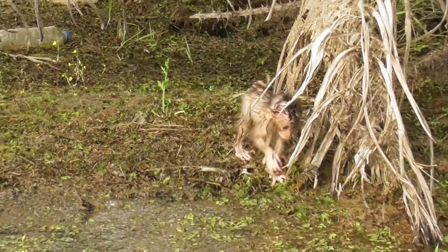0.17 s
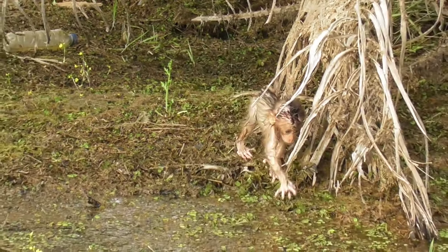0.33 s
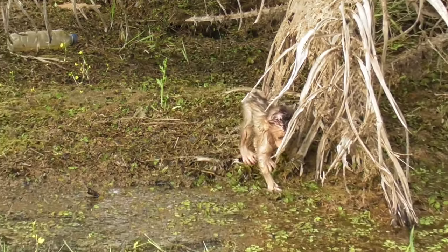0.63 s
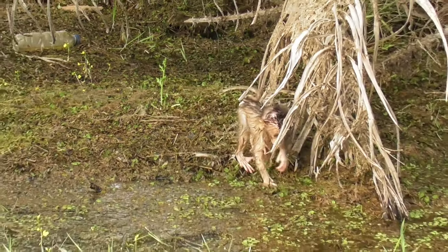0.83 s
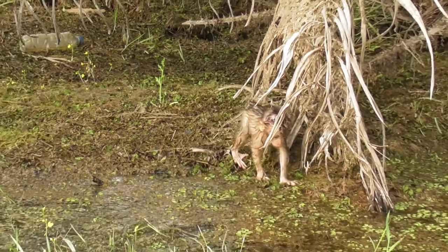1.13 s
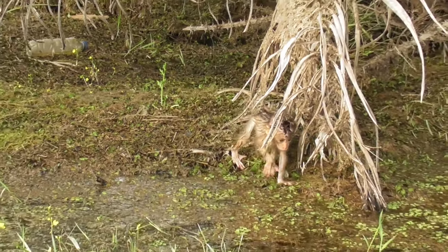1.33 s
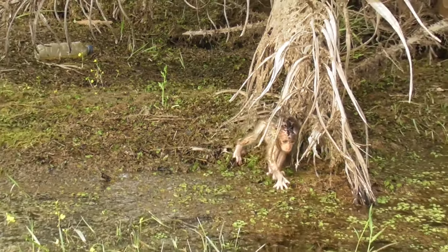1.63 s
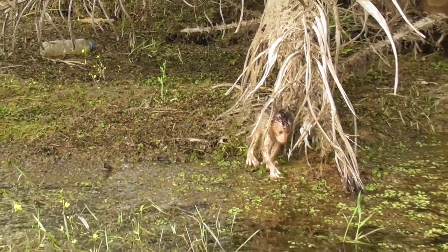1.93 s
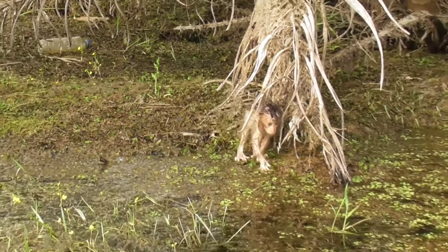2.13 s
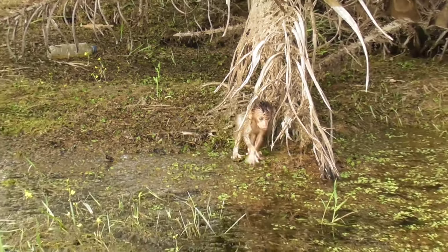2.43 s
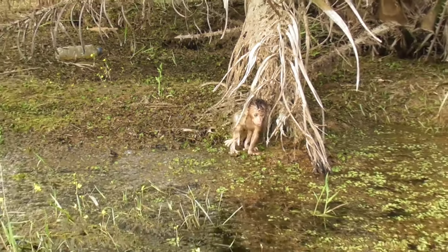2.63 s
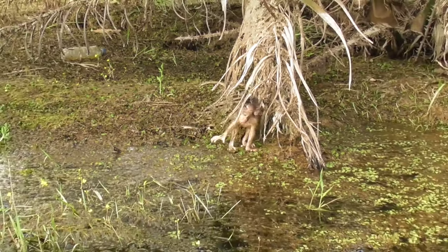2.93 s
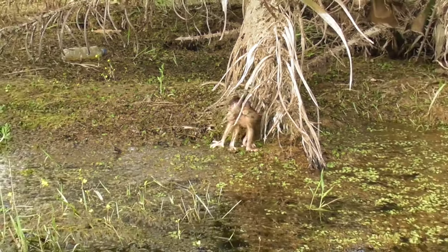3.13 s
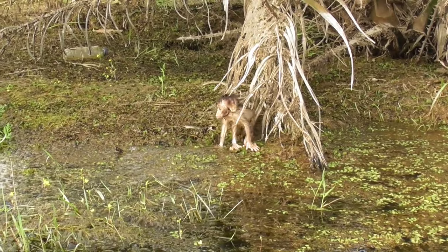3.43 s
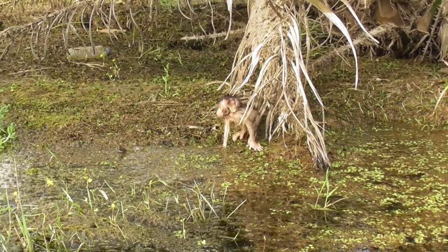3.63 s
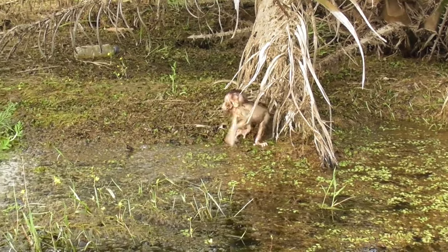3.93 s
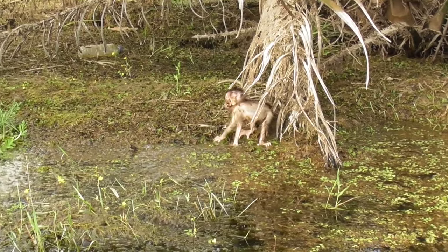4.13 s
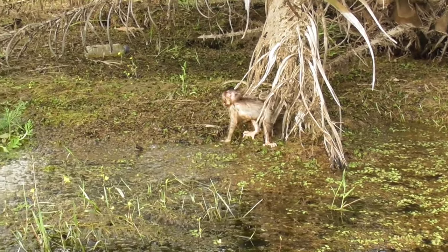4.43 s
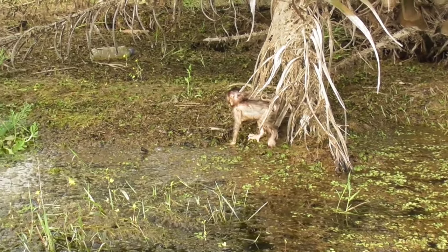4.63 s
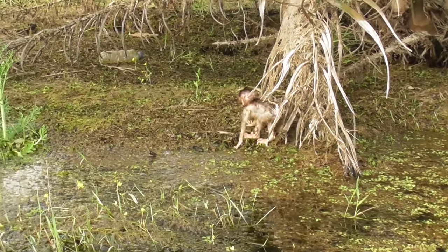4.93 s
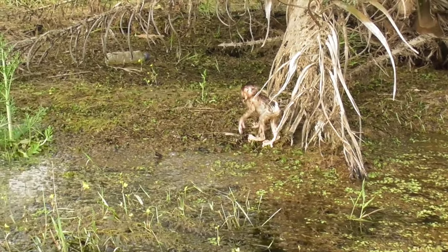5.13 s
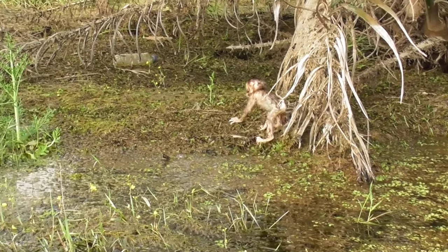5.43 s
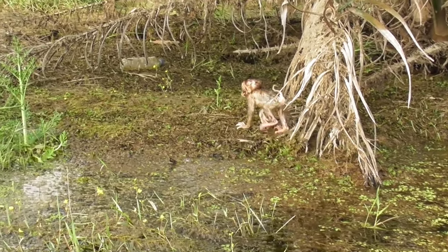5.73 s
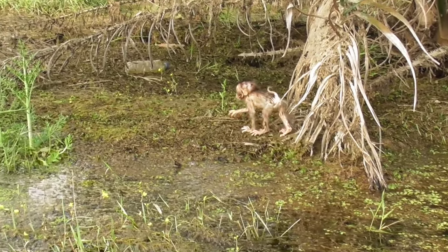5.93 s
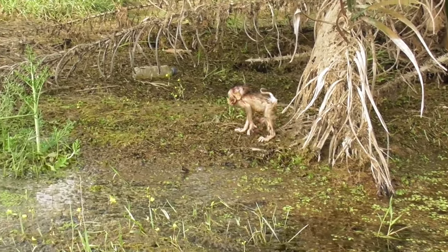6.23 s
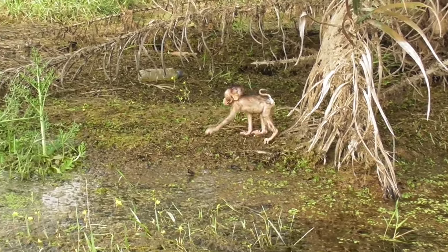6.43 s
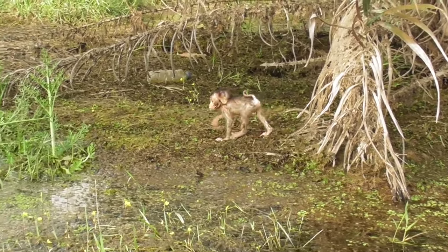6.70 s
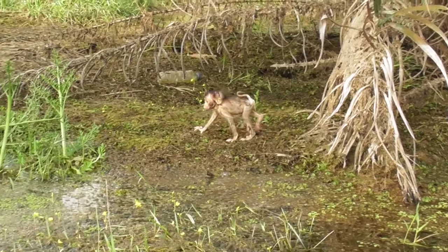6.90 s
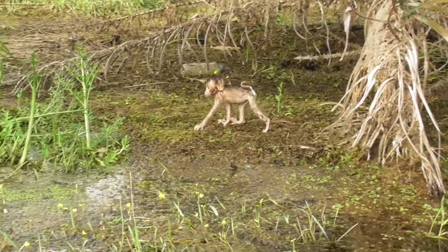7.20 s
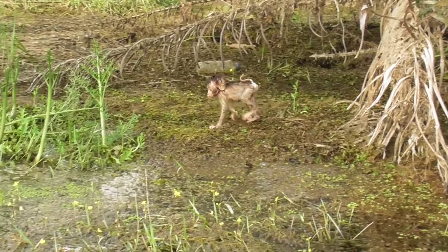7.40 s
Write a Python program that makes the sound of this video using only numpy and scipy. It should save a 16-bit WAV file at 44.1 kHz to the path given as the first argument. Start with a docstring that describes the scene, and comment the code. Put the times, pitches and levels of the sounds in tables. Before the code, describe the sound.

A quiet pond bank in the open air, in wide stereo. A soft low rumble and wavering engine hum, a little left, lie under faint leaf hiss and a thin insect shimmer near 8 kHz with a higher pulsed buzz that comes and goes. From 0 to 0.8 s mellow coos and tiny chirps are heard far off; more whistles and chips run from 1 to 2.2 s, with small dry twig ticks at 1.2 and 1.6 s. At 2.5 s a young monkey begins crying: eight plaintive squeals of about 0.4 s, starting near 2.5, 3.2, 3.9, 4.5, 5.1, 5.8, 6.4 and 7.0 s. Each slides up, wavers, cracks hoarsely and falls; the sixth is highest. A sharper tick falls at 2.9 s, others around 5.1, 5.5 and 7.1 s. Faint birds chirp between cries, one buzzy falling call at 5.6 s. It ends at 7.5 s.

```python
"""Dove-like coos and small-bird notes are heard first, over high insect song and a low engine hum.
Then a young monkey beside a pond gives eight rising, wavering cries: overtones weighted by throat resonances.
The birds and coos are gliding sines, and the twig ticks are noise bursts ringing damped modes.
Insects and engine are noise through narrow resonances; shaped noise gives far rumble and leaf hiss."""
import sys
import numpy as np
from scipy import signal
from scipy.fft import rfft, irfft
from scipy.io import wavfile
from scipy.ndimage import uniform_filter1d

SR = 44100
rng = np.random.default_rng(int(sys.argv[2]) if len(sys.argv) > 2 else 0)


def transcribe(signal):
    """Save signal, clipped to [-1, 1], as a 16-bit WAV file at the path in sys.argv[1]."""
    frames = np.atleast_2d(signal).T
    limited = np.clip(frames, -1, 1)
    pcm = np.round(limited * 32767).astype(np.int16)
    wavfile.write(sys.argv[1], SR, pcm)


def gain_from_db(level_db):
    """Convert decibel levels to linear amplitude factors (20 dB per decade)."""
    decades = np.asarray(level_db, float) / 20
    return 10 ** decades


N = 333386
TIME = np.arange(N) / SR

# Pitch arch of each cry, before cracks and shake: time_s, pitch_hz
CRY_ARCHES = [
    [(2.478, 537), (2.586, 685), (2.724, 864), (2.8, 968), (2.861, 811), (2.907, 732)],
    [(3.167, 491), (3.246, 580), (3.466, 791), (3.558, 873), (3.632, 776)],
    [(3.873, 510), (3.957, 679), (4.06, 958), (4.105, 963), (4.186, 840), (4.262, 719)],
    [(4.462, 585), (4.54, 768), (4.605, 969), (4.64, 1041), (4.7, 1069), (4.795, 1003), (4.839, 814),
     (4.879, 848)],
    [(5.11, 613), (5.184, 794), (5.262, 1014), (5.4, 1110), (5.442, 1118), (5.487, 960), (5.549, 806)],
    [(5.763, 656), (5.833, 834), (5.89, 1106), (5.968, 1226), (6.043, 1392), (6.098, 1160), (6.12, 905),
     (6.22, 765)],
    [(6.415, 521), (6.455, 677), (6.557, 918), (6.62, 970), (6.681, 954), (6.72, 662), (6.808, 768)],
    [(6.998, 478), (7.086, 708), (7.19, 800), (7.224, 851), (7.255, 781), (7.29, 685), (7.362, 727),
     (7.422, 659)],
]
# Throat and mouth resonances, overtones against the cry level: frequency_hz, level_db
THROAT = [(1000, -11.5), (1240, -11), (1360, -2.5), (1520, -5.5), (1700, -15.5), (2050, -32.5),
          (2250, -19.5), (2480, -14), (2780, -9), (3170, -15), (3550, -27.5), (4050, -28.5), (4500, -19),
          (5000, -24), (6500, -17), (7200, -10), (8000, -7.5), (8700, -23), (9300, -35), (11500, -25),
          (12500, -35), (15400, -50)]
# The fundamental swells near the first resonance, before effort: pitch_hz, level_db
FUNDAMENTAL = [(500, -39.5), (800, -37), (870, -32.5), (950, -28), (1050, -25.5), (1170, -28.5),
               (1350, -26.5)]
# Effort of each cry: force_db, tiring_db_per_s (once hoarse), treble_lift_db,
# mouth_scale, hoarse_mouth_scale, nasal_db
EFFORT = [(-2.2, 0, -1, 1.006, 0.994, -31), (-1.1, 1, -4, 1.01, 1.007, -5),
          (-2.5, -11, -4.5, 1.014, 0.973, 1), (-1.6, -6, -4, 1.014, 1.01, 1),
          (-1.25, -41, -4, 1.005, 1.038, 5), (-2.5, -26, 1, 1.038, 1.05, 6.5),
          (-0.65, -39, -6, 0.99, 1.01, 4), (0.6, -31, -7.5, 1.013, 0.985, 9.5)]
# Hoarse stretch of each cry, where the voice breaks: start_s, end_s, roughness (0-1)
HOARSE = [(2.72, 2.9, .2), (3.46, 3.63, .35), (4.12, 4.26, .9), (4.7, 4.87, .6), (5.4, 5.55, .8),
          (6.04, 6.13, .55), (6.69, 6.81, .7), (7.25, 7.42, .45)]
# Period doubling, half lines against the cry level: start_s, end_s, level_db
DOUBLING = [(4.075, 4.11, -21), (4.615, 4.655, -21.5), (4.75, 4.765, -14.5), (5.27, 5.35, -18.5),
            (5.418, 5.434, -10), (5.474, 5.484, -6), (5.89, 5.945, -15.5), (6.105, 6.12, -13),
            (6.6, 6.63, -21.5)]
# Voice cracks, pitch slips under the arch: time_s, drop_hz, half_length_s (before skew)
CRACKS = [(2.743, 127.5, 0.016), (2.84, 146, 0.028), (2.879, 92, 0.0093), (3.493, 159, 0.032),
          (3.578, 135, 0.027), (4.127, 92.4, 0.021), (4.165, 71.7, 0.011), (4.204, 149.4, 0.02),
          (4.234, 100.3, 0.011), (4.663, 84.5, 0.017), (4.723, 132, 0.021), (4.754, 137.3, 0.023),
          (5.363, 118, 0.022), (5.424, 217, 0.018), (5.46, 164.4, 0.022), (5.509, 171, 0.023),
          (6.003, 146.4, 0.042), (6.07, 296, 0.021), (6.64, 90.5, 0.022), (6.774, 136, 0.021),
          (7.27, 68.5, 0.019), (7.338, 88.4, 0.027)]
# Arched bird whistles: start_s, length_s, reference_hz, level_db
WHISTLES = [(0.03, 0.031, 4200, -68), (0.231, 0.026, 4200, -68), (.405, 0.02, 4020, -68.5),
            (.685, 0.037, 3920, -69), (.285, 0.031, 3780, -72), (3.81, 0.021, 3900, -64),
            (.58, 0.029, 4180, -68), (1.45, 0.043, 4050, -67.5), (1.545, 0.06, 4200, -69.5),
            (1.65, 0.048, 4250, -64), (1.757, 0.046, 4200, -66.5), (1.878, 0.05, 4140, -63),
            (1.998, 0.055, 4090, -65.5), (2.125, 0.057, 4010, -68.5), (4.276, 0.037, 3910, -68),
            (4.366, 0.038, 4100, -65), (4.471, 0.051, 4200, -69), (4.958, 0.052, 3960, -64)]
# Successive whistle pitches: share of the reference
WHISTLE_ARCH = [0.92, 0.992, 1.002, 0.995, 0.93]
# Low pointed chips: start_s, length_s, reference_hz, level_db
CHIPS = [(.975, .022, 2190, -67), (1.078, .014, 2480, -68), (1.255, 0.018, 2110, -68),
         (1.375, 0.023, 2040, -75), (1.628, 0.022, 2380, -60), (1.774, 0.034, 2270, -66),
         (6.85, 0.031, 2300, -59)]
# Successive chip pitches: share of the reference
CHIP_ARCH = [.84, 0.96, 0.61]
# Short slurs: start_s, length_s, start_hz, end_hz, level_db
SLURS = [(0.198, 0.0082, 3500, 2700, -67), (0.316, 0.0091, 3850, 2900, -69),
         (0.372, 0.012, 3440, 2630, -65.5), (0.165, 0.011, 3900, 3680, -68), (0.608, .015, 3900, 3530, -73),
         (0.752, 0.0073, 3900, 3650, -60.5), (0.784, .014, 3730, 2900, -69), (0.84, .015, 3400, 3780, -64),
         (3.112, 0.012, 3340, 3750, -68), (3.852, 0.01, 3920, 3310, -63), (0.512, 0.022, 4250, 4130, -70),
         (3.732, .01, 4200, 3420, -68), (3.768, .01, 3350, 3870, -71), (0.488, 0.02, 4600, 4020, -67),
         (0.523, 0.033, 1410, 1640, -68), (0.723, 0.0086, 3800, 3380, -64), (0.87, 0.01, 3800, 3270, -65),
         (2.039, 0.011, 3910, 3450, -62), (3.001, 0.02, 4150, 3400, -63.5), (3.15, 0.0052, 3850, 3320, -59)]
# Buzzy falling calls: start_s, length_s, start_hz, middle_hz, end_hz, level_db
BUZZES = [(3.603, .15, 4540, 3950, 3650, -70), (5.572, 0.31, 4570, 3790, 3670, -62)]
# Quick chatter of farther birds, centre pitch and base level: start_s, length_s, start_hz, end_hz, level_db
CHATTER = [(0.099, 0.29, 3760, 3470, -80), (1.813, 0.31, 3700, 3330, -74.5),
           (2.901, 0.3, 3830, 3410, -77.5), (4.828, 0.23, 3820, 3300, -74.5),
           (6.817, 0.14, 3710, 3474, -75.5)]
# Coos, pitch before scoop and sag: start_s, length_s, pitch_hz, level_db
COOS = [(.005, 0.12, 1242, -53), (0.118, 0.057, 1183, -58), (0.196, 0.036, 1153, -55),
        (0.291, 0.1, 1204, -55.5), (0.475, 0.13, 1196, -56.5), (0.705, 0.12, 1177, -56),
        (2.096, 0.047, 1070, -59.5)]
# Twig ticks, relative strength and extra for modes below 3 kHz: start_s, level_db, low_modes_db
TICKS = [(0.6951, -49.5, 5.5), (1.2214, -33.5, -12), (1.602, -35.5, -10), (2.373, -45, -37),
         (2.9379, -25, -6.5), (2.957, -37, -9), (5.103, -37.5, -6), (5.521, -35, -3), (6.812, -55, 15),
         (7.0785, -36, -18), (7.398, -39, -20)]
# Modes of a twig: frequency_hz, nominal_width_hz, level_db
TWIG_MODES = [(804, 180, 14), (1860, 600, 7.5), (4200, 810, -0.5), (6140, 2700, 4), (10100, 2100, -19)]
# Level of the buzzing insect: time_s, level_db
INSECT_BUZZ = [(0, -63), (1.76, -62.5), (1.8, -76), (4.5, -61), (5.35, -61.5), (5.5, -69), (6.4, -72),
               (6.75, -65.5), (7.56, -63)]
# Hum lines of the engine, the lowest relative to its wander: frequency_hz, width_hz, first_db, last_db
ENGINE_ORDERS = [(70, 3.6, -6, -0.5), (138.16, 4.1, -52.5, -52.5)]
# Chance level wander of the lowest hum line: time_s, level_db
HUM_WANDER = [(0, -45), (1.3, -54.5), (1.45, -36.5), (2.7, -66), (3, -31), (3.3, -63), (4.4, -39.5),
              (7.1, -63), (7.45, -36), (7.56, -40)]
# Relative spectrum of the air: frequency_hz, level_db
AIR_SPECTRUM = [(25, -26), (61, 0.5), (126, -2.5), (340, -17), (650, -21), (1600, -38.5), (3900, -47),
                (5600, -50), (7600, -42.5), (11000, -47), (15400, -44), (15600, -110)]
# Left-right likeness of the air: frequency_hz, likeness (0-1)
LIKENESS = [(30, 0.95), (100, 0.88), (200, 0.72), (350, 0.013), (800, 0.72), (6000, 0.9), (9000, 1),
            (13000, 0.074)]
# Stereo lean of the air, positive to the left: frequency_hz, lean (exponent of the channel gains)
LEAN = [(40, -7), (130, -4.5), (1000, -1.1), (10000, 0.5)]
# Echoes off water and trunks, on the left: delay_s, level_db
ECHOES = [(.009, -21), (.023, -14)]


def rms_one(x):
    """Normalization: scales to rms 1."""
    return x / np.sqrt(np.mean(x ** 2, axis=-1, keepdims=True) + 1e-20)


def in_time(rows, t=TIME):
    """Linear interpolation: columns of a table, read at the times t."""
    s, *columns = np.transpose(rows)
    return [np.interp(t, s, c) for c in columns]


def at_hz(points, hz):
    """Interpolation of a spectrum on a log-frequency axis."""
    table = np.array(points)
    return np.interp(np.log(hz), np.log(table[:, 0]), table[:, 1])


def spans(rows, rest, size):
    """Moving average: a control rests at one value and steps softly to another in each span."""
    out = np.full(N, float(rest))
    for start, end, value in rows:
        out[round(start * SR):round(end * SR)] = value
    return uniform_filter1d(out, size=size)


def drift(rate_hz):
    """Random modulation of spread 1: noise through two one-pole low-passes."""
    r = np.exp(-2 * np.pi * rate_hz / SR)
    once = signal.lfilter([1], [1, -r], rng.standard_normal(N + SR))
    return rms_one(signal.lfilter([1], [1, -r], once)[SR:])


def resonance(x, hz, width_hz):
    """Damped resonance: a two-pole band-pass with gain near 1 on top."""
    r = np.exp(-np.pi * width_hz / SR)
    poles = [1, -2 * r * np.cos(2 * np.pi * hz / SR), r * r]
    return signal.lfilter([(1 - r * r) / 2, 0, (r * r - 1) / 2], poles, x)


def twice_resonant(x, hz, width_hz):
    """Cascaded resonance: two equal band-passes give steeper skirts."""
    return resonance(resonance(x, hz, width_hz), hz, width_hz)


def coloured(spectrum, channels):
    """Spectral shaping: white noise weighted by a spectrum, rms 1."""
    hz = np.arange(N // 2 + 1) * SR / N + 1
    white = rfft(rng.standard_normal((channels, N)))
    return rms_one(irfft(white * gain_from_db(at_hz(spectrum, hz)), N))


def placed(x, pan_db):
    """Interchannel level difference: mono to stereo, left louder by pan_db."""
    return x * gain_from_db(np.array([[pan_db / 2], [-pan_db / 2]]))


def add(out, start_s, sound):
    """Superposition: mixes a short sound in."""
    i = round(start_s * SR)
    out[i:i + len(sound)] += sound[:N - i]


def crack_slips():
    """Register break: the pitch falls fast, dwells at the bottom and climbs back more slowly; in Hz."""
    flat, skew = 1.2, 0.241   # flat over 1 makes the dwell
    slip_hz = 0
    for s, drop_hz, half_s in CRACKS:
        distance = abs(TIME - s) / (half_s * (1 + skew * np.sign(TIME - s)))
        slip_hz = slip_hz + drop_hz * np.clip(flat * (1 - distance), 0, 1)
    return slip_hz


def monkey(tilt=-0.4, hoarse_lift_db=5, breath_db=-20, waver_db=2.6,
           blur=.3, hoarse_blur=.3, rasp_db=-20, grit_db=1.8):
    """Source-filter voice: throat-weighted overtones, with half lines when every second cycle is weaker."""
    burst_db, burst_s = 17, 0.0029        # the folds spring open
    release_db, release_s = -34, 0.011    # and the air stops
    second_spared = 0.98                  # share of the tiring that the second overtone escapes
    nasal_hz, nasal_width_hz = 3520, 470  # where the nose alters the overtones
    bloom_rise = 0.56                     # relative pitch rise by which the lips are open
    falter_db_per_hz_ms = -.4             # overtones falter while the pitch tumbles

    out, shake, breath = np.zeros(N), drift(170), coloured(THROAT[4:], channels=1)[0]
    wavers = [drift(32) for _ in range(6)]
    flutters = [drift(260) for _ in range(6)]
    hoarse, doubling = spans(HOARSE, rest=.12, size=900), spans(DOUBLING, rest=-60, size=200)
    slip_hz = crack_slips()
    tumble = uniform_filter1d(np.maximum(np.gradient(slip_hz), 0), size=90) * SR / 1000   # Hz per ms
    falter_db = falter_db_per_hz_ms * tumble

    for rows, effort, (hoarse_s, *_) in zip(CRY_ARCHES, EFFORT, HOARSE):
        force_db, tiring, lift_db, clear_mouth, hoarse_mouth, nasal_db = effort
        span = slice(round(rows[0][0] * SR), round(rows[-1][0] * SR))
        t, rough = TIME[span], hoarse[span]
        waver, flutter = [w[span] for w in wavers], [f[span] for f in flutters]
        mouth = np.interp(t - hoarse_s, [-.02, .02], [clear_mouth, hoarse_mouth])
        tired_db = tiring * np.maximum(t - hoarse_s, 0)

        # a hoarse voice keeps stumbling into half lines
        stumble_db = rasp_db + 40 * np.log10(rough) + 5 * waver[0]
        doubled_db = np.maximum(doubling[span], stumble_db)

        pitch = in_time(rows, t)[0] - slip_hz[span]
        pitch = uniform_filter1d(pitch, size=120, mode="nearest") * (1 + .014 * rough * shake[span])
        phase = 2 * np.pi * np.cumsum(pitch) / SR

        # second overtone relative to the first
        second_db = at_hz(THROAT, 2 * pitch / mouth) + hoarse_lift_db * rough - second_spared * tired_db
        second_db += waver_db * rough * waver[2] + falter_db[span] + grit_db * rough * flutter[2]
        first_db = force_db + at_hz(FUNDAMENTAL, pitch) + tired_db
        first_db += burst_db * np.exp((t[0] - t) / burst_s)
        first_db += release_db * np.exp((t - t[-1]) / release_s)
        level_db = first_db + 10 * np.log10(1 + gain_from_db(2 * second_db))

        # soft effort keeps relatively more of the top
        top_db = level_db + lift_db + tilt * (level_db + 52.0)
        # the lips part as the pitch climbs and close at the end: the treble blooms late and dies early
        rise = np.maximum.accumulate(pitch) / pitch[0] - 1
        shut = np.clip(1 - rise / bloom_rise, 0, 1)
        closed_db = -24 * (shut + np.exp((t - rows[-1][0]) / 0.027))

        voice = np.sin(phase) * gain_from_db(first_db) + np.sin(2 * phase + 1) * gain_from_db(first_db + second_db)
        half_lines = np.sin(1.5 * phase) + gain_from_db(-7) * np.sin(.5 * phase)
        voice += gain_from_db(level_db + doubled_db) * half_lines
        for k in np.arange(2.5, 15, .5):
            throat_hz = k * pitch / mouth
            db = top_db + at_hz(THROAT, throat_hz) + np.clip(k - 3.35, 0, 1) * closed_db
            db += falter_db[span] + waver_db * (1 + rough) * waver[int(k) % 6]
            db += nasal_db * np.exp(-((throat_hz - nasal_hz) / nasal_width_hz) ** 2)
            db += grit_db * rough * flutter[int(k + 1) % 6]
            db -= np.maximum(k * pitch - 9000, 0) / 300   # the highest lines fade
            if k % 1 > 0:   # half lines
                db += np.minimum(doubled_db + 4.5 + 0.45 * k, 0)
            # uneven cycles smear the higher lines into a haze
            smear = (blur + hoarse_blur * rough) * k * pitch / 8000 * flutter[int(k) % 6]
            voice += gain_from_db(db) * np.sin(k * phase + k * k + smear)
        # uneven cycles let air hiss through
        voice += gain_from_db(top_db + breath_db + closed_db + 6 * rough) * breath[span]
        out[span] += np.sqrt(2) * voice * signal.windows.tukey(len(voice), .035)
    return out


def note(length_s, hz, db, shiver_hz=0):
    """Frequency modulation: a soft-edged sine gliding through the given pitches."""
    u = np.linspace(0, 1, max(round(length_s * SR), 8))
    fit = np.polyfit(np.linspace(0, 1, len(hz)), hz, len(hz) - 1)
    phase = 2 * np.pi * np.cumsum(np.polyval(fit, u) + shiver_hz) / SR
    return gain_from_db(db) * np.sqrt(2) * np.sin(np.pi * u) ** 0.24 * np.sin(phase)


def birds(margin_s=.004, chatter_per_s=70, buzz_spread_hz=210, ragged_db=3):
    """Gliding tones: single notes, buzzes with fast-shivering pitch, and chatter of quick scattered down-slurs."""
    out = np.zeros(N)
    singles = [(s, length, hz, db) for s, length, *hz, db in SLURS]
    for rows, arch in [(WHISTLES, WHISTLE_ARCH), (CHIPS, CHIP_ARCH)]:
        singles += [(s, length, hz * np.array(arch), db) for s, length, hz, db in rows]
    for s, length, hz, db in singles:
        add(out, s - margin_s, note(length + 2 * margin_s, hz, db))

    shiver = buzz_spread_hz * drift(198)
    for s, length, *hz, db in BUZZES:
        add(out, s, note(length, hz, db, shiver[round(s * SR):][:round(length * SR)]))

    for s, length, start_hz, end_hz, db in CHATTER:
        count = round(length * chatter_per_s)
        for k, (late, high, fall, loud) in enumerate(rng.random((50, 4))[:count]):
            when = (k + 2.5 * late) / (count + 1.5)   # share of the length
            hz = (start_hz + (end_hz - start_hz) * when) * (.95 + 0.137 * high)
            slur = [hz * 1.05, hz * (.97 - 0.28 * fall)]
            add(out, s + when * length, note(0.012, slur, db + 5.5 + 12 * (loud - .5)))
    return out * gain_from_db(ragged_db * drift(52))   # moving air and leaves fray the far song


def coos(scoop_depth=0.231, scoop_share=0.155, sag_hz_per_s=420, fade_db=-1):
    """Near-sinusoidal phonation: mellow notes whose pitch scoops up and then sags."""
    out = np.zeros(N)
    for s, length, hz, db in COOS:
        t = np.arange(0, length, 1 / SR)
        scoop = np.exp(-t / (scoop_share * length))
        pitch = hz * (1 - scoop_depth * scoop) - sag_hz_per_s * t
        tone = np.sqrt(2) * np.sin(2 * np.pi * np.cumsum(pitch) / SR)
        level = gain_from_db(db + fade_db * (t / length + scoop))
        add(out, s, level * tone * signal.windows.tukey(len(t), .3))
    return out


def twigs(snap_s=0.0023):
    """Modal excitation: tiny noise bursts ring the same broad modes, the low ones with a strength of their own."""
    out, t = np.zeros(N), np.arange(600) / SR
    for s, db, low_db in TICKS:
        burst = rng.standard_normal(len(t)) * np.exp(-t / snap_s)
        rung = 0
        for hz, width, mode_db in TWIG_MODES:
            mode = rms_one(twice_resonant(burst, hz, 2 * width))
            rung = rung + gain_from_db(mode_db + low_db * (hz < 3000)) * mode
        add(out, s, gain_from_db(db - 26.0) * rung)
    return out


def pulsation(depth_db, rate_hz, spread, drift_hz):
    """Amplitude modulation: a sinusoidal swing in dB whose rate drifts by a relative spread."""
    rate = rate_hz * (1 + spread * drift(drift_hz))
    return gain_from_db(depth_db * np.sin(2 * np.pi * np.cumsum(rate) / SR))


def insects(cricket_db=-58.5):
    """Resonant stridulation: a throbbing cricket, a steadier chorus and singer, and a broad pulsed buzz above."""
    buzz_db, = in_time(INSECT_BUZZ)
    white = rng.standard_normal((5, N))
    throb = pulsation(depth_db=4, rate_hz=17.5, spread=0.0396, drift_hz=2.1)
    near = rms_one(twice_resonant(white[0], 8235, 150) * throb)
    chorus = near + gain_from_db(-1.0) * rms_one(twice_resonant(white[1:3], 8180, 310))
    singer = gain_from_db(-6.0) * rms_one(twice_resonant(white[0], 8430, 40))
    pulses = pulsation(depth_db=4, rate_hz=213, spread=0.013, drift_hz=0.72)
    buzz = rms_one(twice_resonant(white[3:], 9480, 1100) * pulses)
    return gain_from_db(cricket_db) * (chorus + singer) + gain_from_db(buzz_db) * buzz


def engine():
    """Narrow-band noise: narrow hums, the lowest wandering at random in level."""
    hum = 0
    for k, (hz, width, start_db, end_db) in enumerate(ENGINE_ORDERS):
        order = twice_resonant(rng.standard_normal(N + SR), hz, width)[SR:]
        size = np.sqrt(uniform_filter1d(order ** 2, size=6000))   # evens out the beating
        db = np.linspace(start_db, end_db, N)
        if k == 0:
            db = db + in_time(HUM_WANDER)[0]
        hum = hum + gain_from_db(db) * order / size
    return hum


def air(level_db=-46):
    """Partial coherence: far traffic rumble and leaf hiss, partly alike in the two channels."""
    hz = np.arange(N // 2 + 1) * SR / N + 1
    mid, side = rfft(coloured(AIR_SPECTRUM, channels=2))
    alike = np.clip(at_hz(LIKENESS, hz), 0, 1)
    pair = np.sqrt(1 + alike) * mid + np.sqrt(1 - alike) * side * [[1], [-1]]
    channel_gains = placed(0.96, 0.79) ** at_hz(LEAN, hz)
    return gain_from_db(level_db) * irfft(pair * channel_gains, N)


def outdoors(x):
    """Discrete reflection: a few dull echoes, each later on the right."""
    dull, out = resonance(x, 1200, 2200), np.zeros((2, N))
    for delay, db in ECHOES:
        for side, stretch in enumerate([1, 1.17]):
            add(out[side], delay * stretch, gain_from_db(db) * dull)
    return out


def foliage(x, t60_s=.12):
    """Diffuse scattering: leaves give far song a short decaying tail, partly alike on both sides."""
    t = np.arange(SR // 5) / SR
    shared, left, right = rng.standard_normal((3, len(t))) * gain_from_db(-60 * t / t60_s)
    tails = np.array([shared + 0.27 * left, shared + 0.46 * right])
    tails /= np.sqrt(np.sum(tails[0] ** 2))
    return signal.fftconvolve(x[None], tails, axes=1)[:, :N]


def scene():
    """Superposition of all sources in their places."""
    cry, song = monkey(), birds() + coos()
    voices = placed(cry, pan_db=-0.5) + placed(song, pan_db=-2.0)
    voices += outdoors(cry) + gain_from_db(-5.0) * foliage(song)
    voices += gain_from_db(-15) * resonance(cry, 710, 1400) * [[1], [-1]]   # the lower part leans left
    return voices + twigs() + insects() + placed(engine(), pan_db=-5.0) + air()


def top_cut(x):
    """Nothing passes above the cut-off."""
    return signal.sosfilt(signal.butter(12, 16390, fs=SR, output="sos"), x)


def record(dry):
    """Delivery: the finished mix in its final form."""
    return top_cut(dry)


dry = scene()
out = record(dry)
transcribe(out)
```